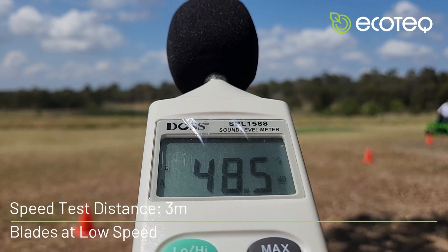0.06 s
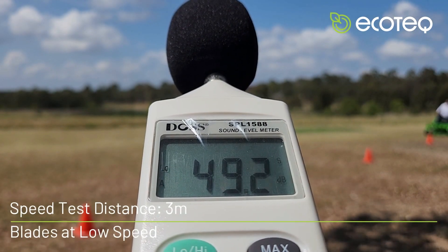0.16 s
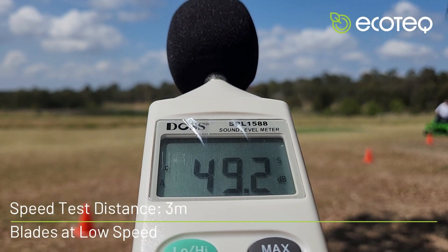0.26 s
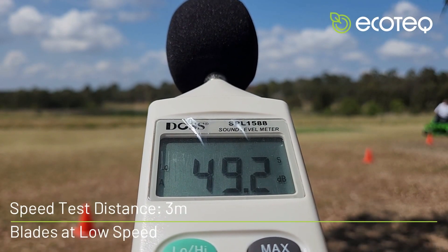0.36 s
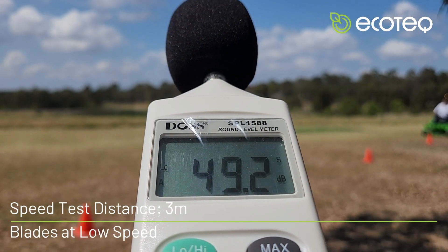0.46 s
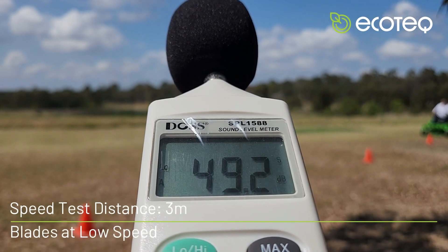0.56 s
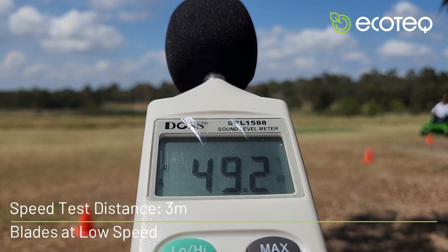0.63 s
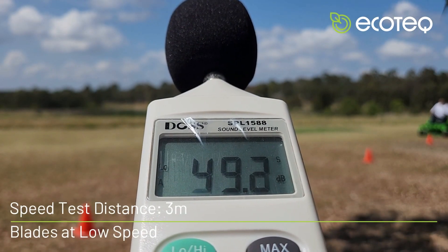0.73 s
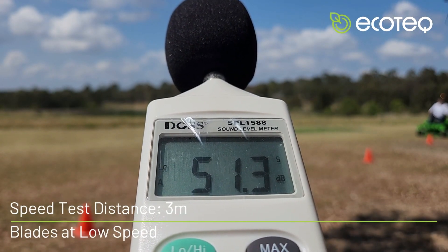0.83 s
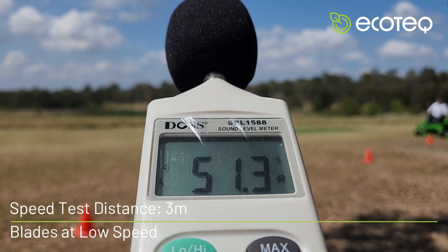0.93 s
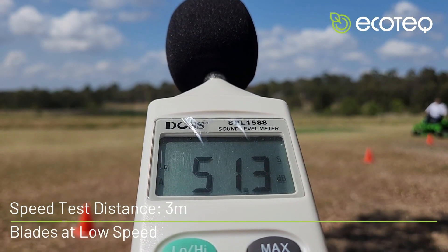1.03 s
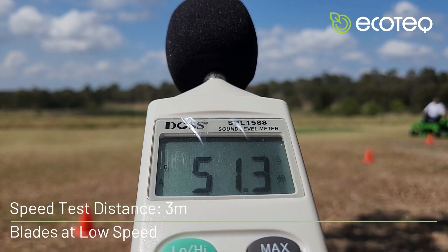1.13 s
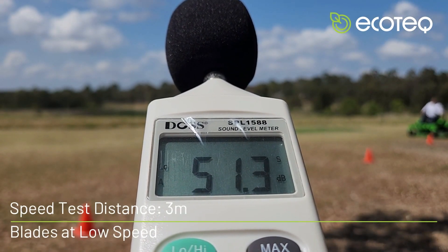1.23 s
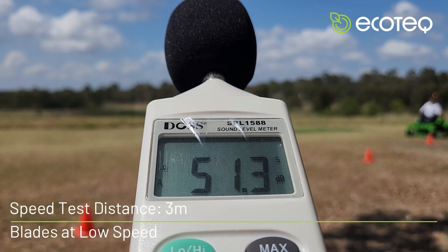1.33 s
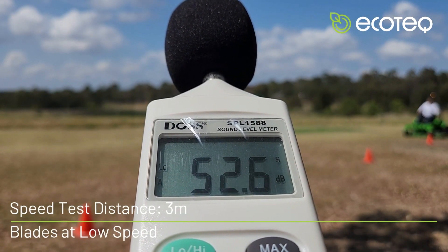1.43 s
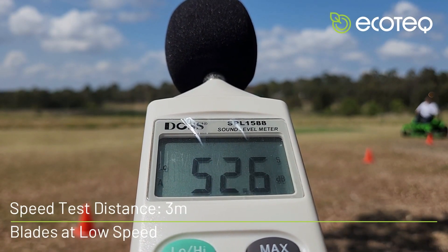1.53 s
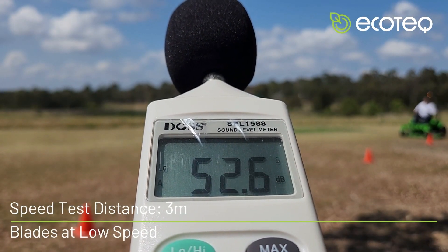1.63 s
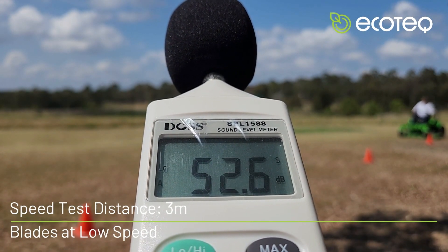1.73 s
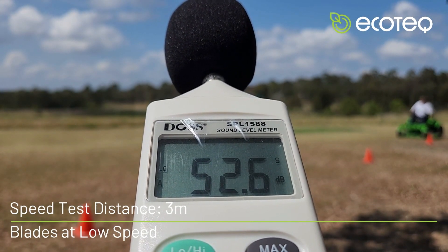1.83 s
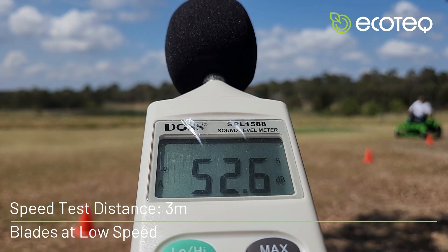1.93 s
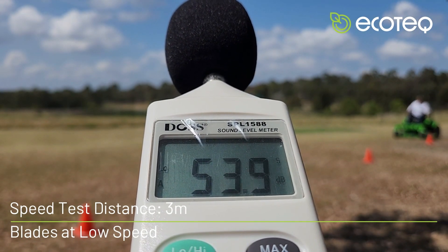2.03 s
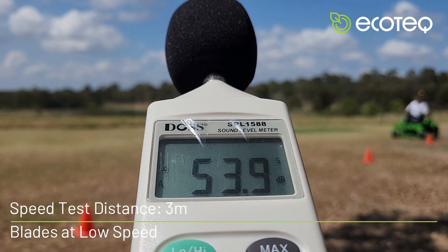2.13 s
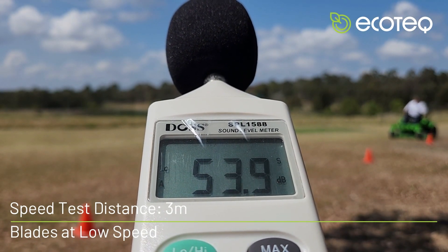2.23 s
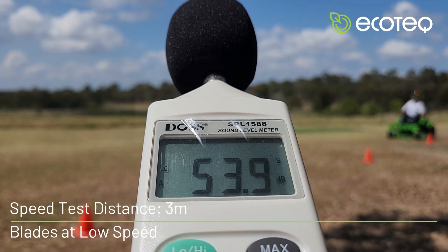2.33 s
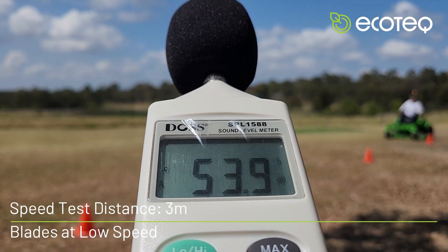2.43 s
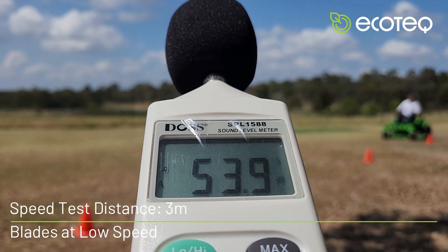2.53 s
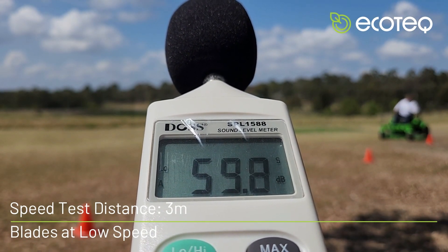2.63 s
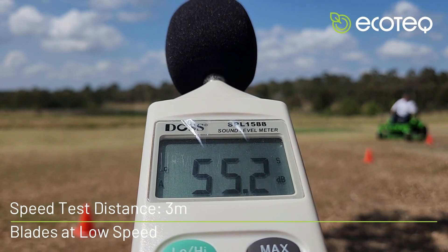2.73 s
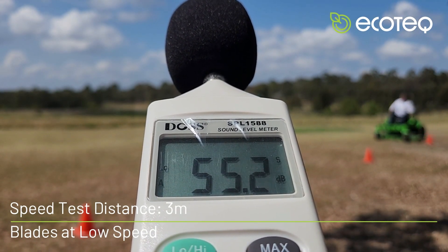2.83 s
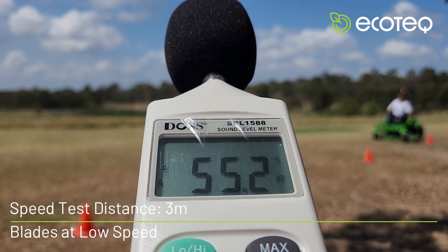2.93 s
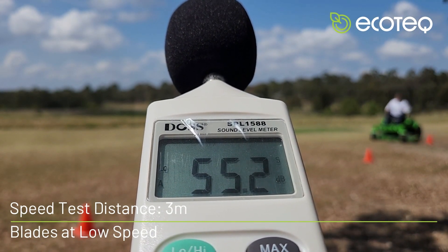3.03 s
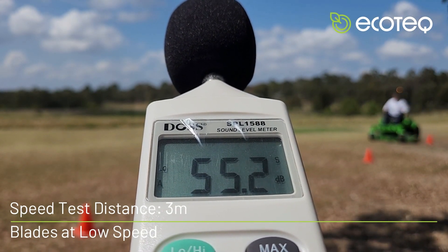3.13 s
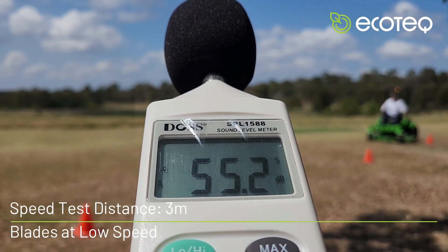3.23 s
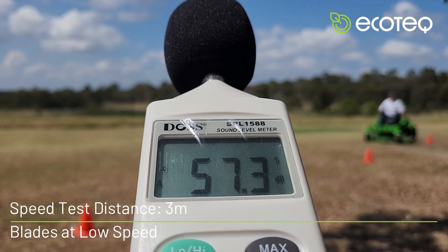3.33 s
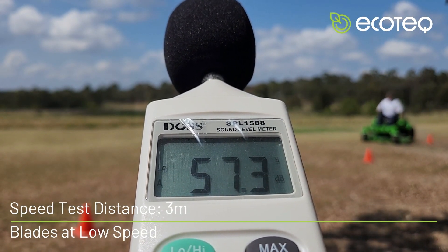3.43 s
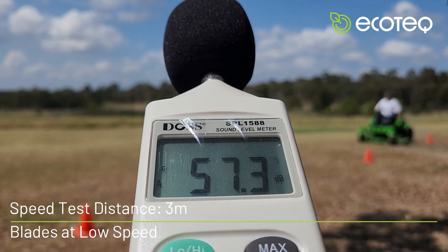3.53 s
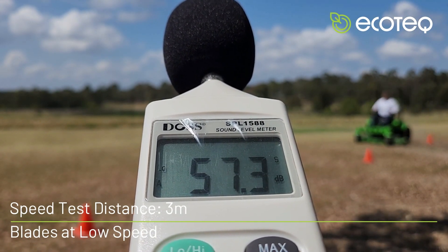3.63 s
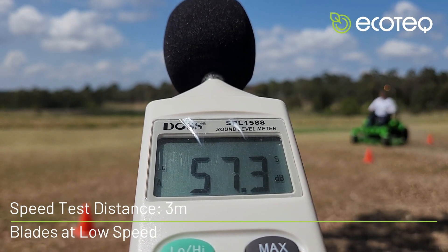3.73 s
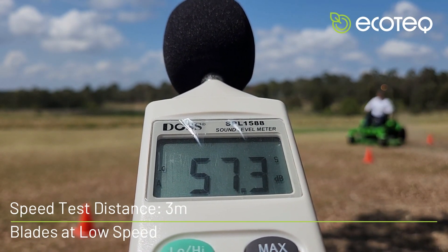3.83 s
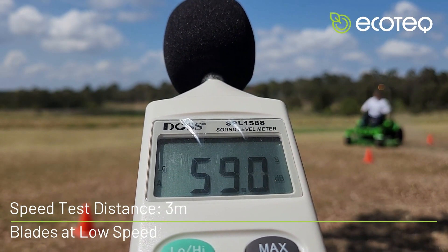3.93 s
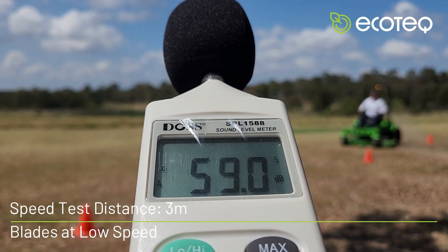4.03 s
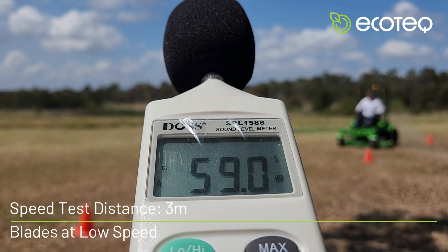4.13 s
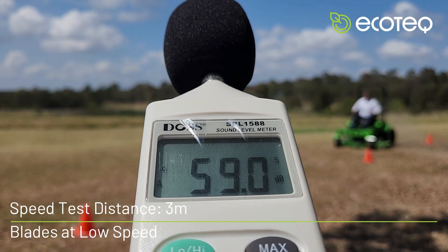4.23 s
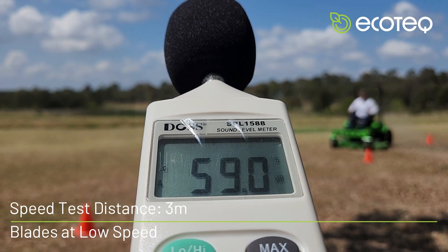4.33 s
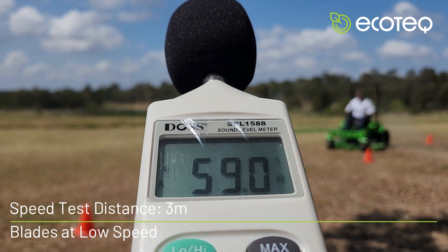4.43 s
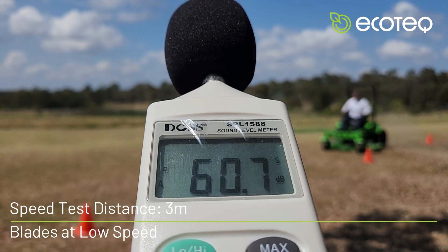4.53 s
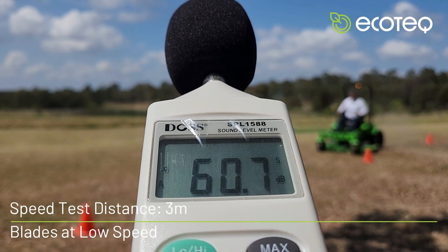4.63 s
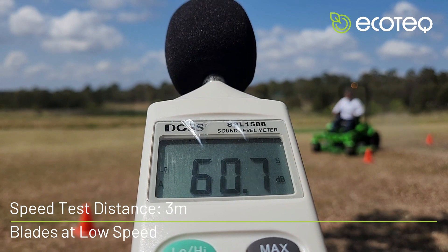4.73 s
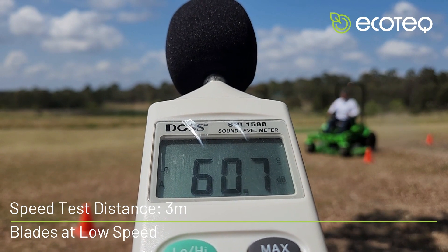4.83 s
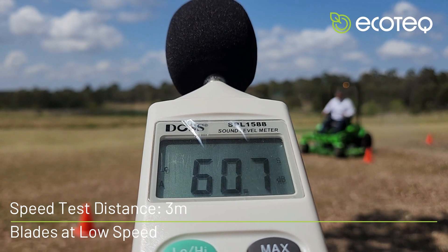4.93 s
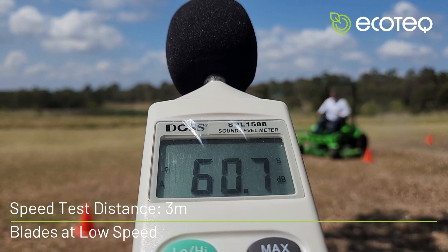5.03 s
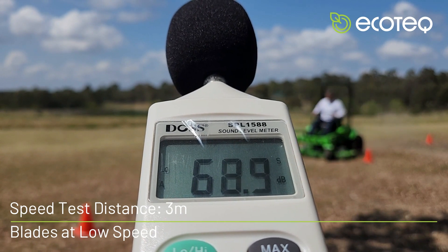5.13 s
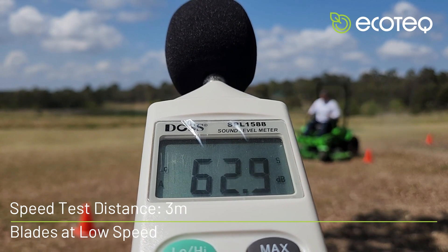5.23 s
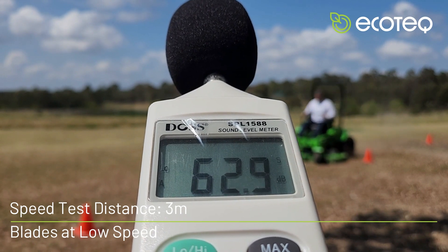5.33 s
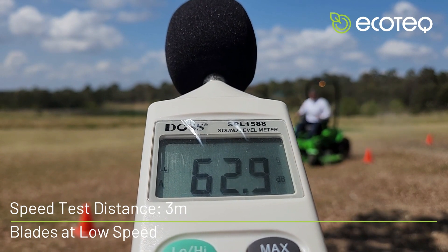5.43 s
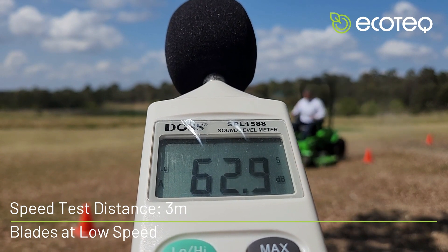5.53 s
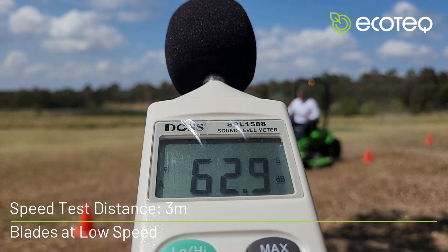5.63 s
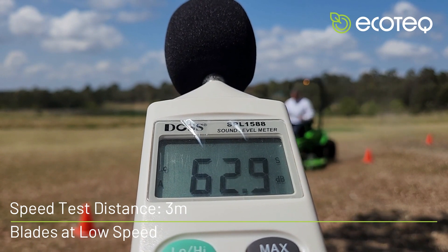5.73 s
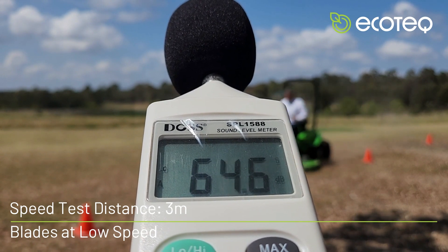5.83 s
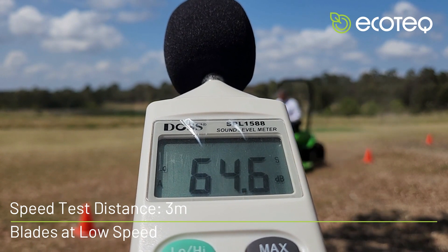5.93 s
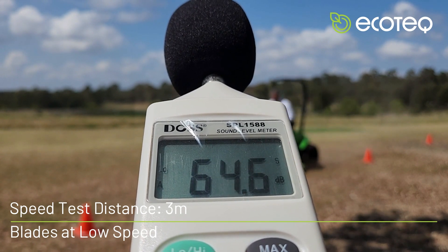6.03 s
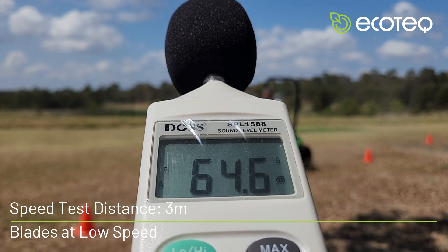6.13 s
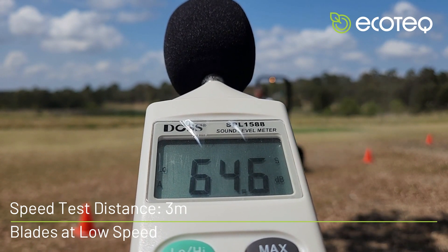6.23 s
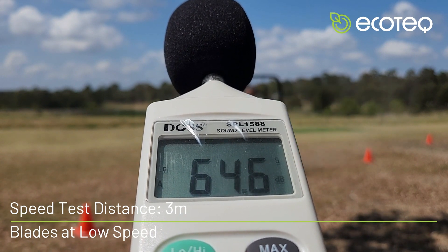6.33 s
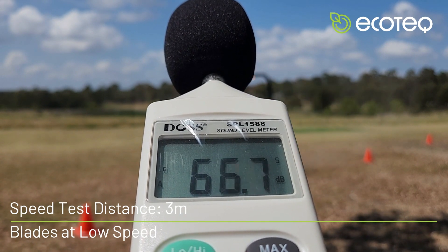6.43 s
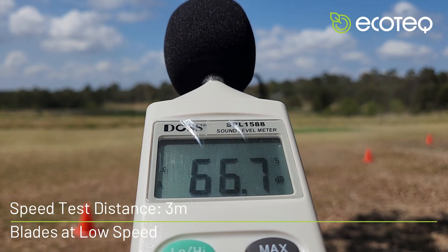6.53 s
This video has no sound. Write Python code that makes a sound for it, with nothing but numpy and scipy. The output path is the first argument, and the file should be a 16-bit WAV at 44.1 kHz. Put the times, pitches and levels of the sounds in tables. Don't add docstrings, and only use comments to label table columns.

```python
import sys
import numpy as np
from scipy import signal
from scipy.fft import rfft, irfft, next_fast_len
from scipy.io import wavfile
from scipy.ndimage import uniform_filter1d, map_coordinates

SR = 44100
rng = np.random.default_rng(int(sys.argv[2]) if len(sys.argv) > 2 else 0)


def boost(x):
    u = np.asarray(x, float) / 20
    return 10 ** u


def wav_record(signal):
    frames = np.transpose(np.atleast_2d(signal))
    bounded = np.clip(frames, -1, 1)
    quanta = np.round(bounded * 32767).astype(np.int16)
    wavfile.write(sys.argv[1], SR, quanta)


N = 289516
TIME = np.arange(N) / SR

# (time [s], level [dB])
GUSTS = [(0.0, -34), (0.42, -32.5), (0.55, -42.5), (0.85, -36.5), (1.9, -34.5), (2.2, -30), (3.2, -27),
         (3.6, -30.5), (4.2, -27), (4.8, -28), (6.0, -28.5), (6.2, -25.5), (6.56, -36)]
# (frequency [Hz], density [dB per Hz])
WIND_COLOUR = [(12, -34), (28, -22), (60, -1), (90, 2.5), (130, -2), (170, -17.5), (230, -17), (320, -50)]
# (time [s], level [dB], pitch [Hz])
EDDIES = [(.285, -26, 60), (1.22, -39, 65), (2.445, -8, 45), (2.875, -8, 61.3), (4.18, -18, 45),
          (4.48, -22, 50), (4.8, -13, 37), (5.14, -12, 55), (5.3, -16, 50), (6.09, -19, 50),
          (6.18, -10.5, 65)]
# (frequency [Hz], density [dB per Hz])
FIELD_COLOUR = [(200, 15), (500, 5), (1500, 8.5), (3500, 5.5), (7000, -9), (11000, 8), (17000, -53)]
# (time [s], level [dB])
ROAR = [(0.0, -40), (0.12, -37.5), (0.6, -44), (1.57, -46), (2.04, -40), (2.5, -41), (2.67, -38.5),
        (2.85, -38), (4.66, -34.5), (5.1, -35.5), (5.25, -31.5), (5.5, -33.5), (5.93, -31.5), (6.03, -30),
        (6.18, -31), (6.3, -32.5), (6.56, -29.5)]
# (frequency [Hz], density [dB per Hz])
DECK_COLOUR = [(230, -30), (300, -0.5), (400, -12), (540, -3), (690, 1), (800, -10), (870, -9.5),
               (1000, -5.5), (1300, -2), (1420, -7), (1550, -19), (2000, -31)]
# (time [s], level [dB])
HUM = [(0.08, -39), (.27, -22), (0.52, -34), (0.72, -22.5), (1.0, -28.5), (1.15, -45), (1.3, -29),
       (1.72, -28.5), (2.05, -17.5), (3.18, -15.5), (3.31, -30.5), (3.5, -19), (3.85, -17.5), (4.22, -27),
       (4.34, -13), (5.0, -13), (6.4, -20.5), (6.56, -25)]
CANCELS = [.52, 1.42, 2.03, 3.16, 4.25, 5.15, 7.8]
# (start [s], length [s], level [dB])
ROCKS = [
    (.82, 0.076, -46),
    (2.037, 1.13, -30),
    (3.692, 0.17, -32.5),
    (4.08, 0.064, -27.5),
    (4.3, 0.98, -41.5),
    (5.45, 0.24, -40),
    (6.08, .4, -38),
]
# (multiple [1], level [dB])
SHUDDER_LINES = [(3, -1), (4, 3.5), (5, -7), (6, -0.5), (7, -19)]
# (time [s], width [s], level [dB], tilt [dB per multiple])
SHUDDERS = [
    (0.13, 0.05, -33.5, -4.5),
    (0.31, 0.033, -34, -3),
]
# (multiple [1], level [dB])
OVERTONES = [(1, -35), (5, -7), (6, -5.5), (8, -11.5), (9, -9.5), (10, -5.5), (12, -5.5), (13, -10)]
# (frequency [Hz], density [dB per Hz])
GRASS_COLOUR = [(1300, -19.5), (1750, -0.5), (2350, -1.5), (2550, -11.5), (2950, -8.5), (3080, 0.5),
                (3750, -6.5), (3950, -15), (4600, -12), (5400, -8), (6100, -14), (6400, -55), (8500, -44)]
# (frequency [Hz], density [dB per Hz])
CHAFF_COLOUR = [(4000, -44), (5400, 7.5), (7000, -2.5), (8500, 1.5), (10500, 8.5), (12500, 4.5), (15000, 2),
                (17000, 16.5)]
# (time [s], width [s], cut grass level [dB], chaff level [dB])
PATCHES = [(0.4, 0.047, -38.5, -46.5), (0.903, 0.32, -45, -50.5), (1.993, 0.089, -48, -50),
           (3.188, 0.068, -44, -55), (3.75, 0.35, -41.5, -50.5), (4.25, 0.6, -44.5, -48.5),
           (4.608, 0.053, -38, -46.5), (5.374, 0.22, -38.5, -45.5), (6.08, 0.27, -39, -44),
           (6.35, 0.055, -54, -69), (6.527, 0.037, -41, -47.5), (2.995, 0.05, -51, -49)]
# (time [s], pitch [Hz], level [dB])
SWITCHING = [(0, 15500, -65), (.4, 15590, -64), (.9, 16300, -82), (2.8, 16000, -75), (4.5, 15000, -69),
             (6.56, 15520, -54)]
# (start [s], length [s], end pitch [Hz], level [dB], extra at load peak [dB])
LOW_SQUEAKS = [(0.079, 0.19, 9600, -46, 1), (0.847, 0.092, 10360, -33, 5.5), (1.38, .11, 10100, -34, -9),
               (1.943, .1, 9990, -36.5, 12.5), (2.442, 0.087, 10100, -38.5, 16.5),
               (2.922, 0.087, 10170, -38, 7.5), (3.394, 0.086, 10060, -32, 0.5),
               (3.834, .068, 10150, -27.5, -5), (4.268, 0.081, 10130, -27, 1),
               (4.661, 0.081, 10500, -25.5, 0), (5.036, .083, 10070, -26, 7.5),
               (5.424, 0.063, 10430, -24.5, 7.5), (5.799, 0.089, 10300, -24.5, -1),
               (6.163, 0.058, 10300, -19.5, -12), (6.531, .07, 10200, -32, 0)]
# (start [s], length [s], start pitch [Hz], rise [Hz], level [dB])
MID_SQUEAKS = [(.022, 0.086, 10370, 450, -42.5), (.797, 0.086, 10480, 420, -38.5),
               (2.415, .033, 10640, 450, -36), (2.878, 0.076, 10550, 250, -35),
               (3.365, 0.035, 10500, 650, -34.5), (3.792, 0.049, 10490, 400, -26),
               (4.637, .03, 10440, 600, -27), (5.37, 0.052, 10200, 1140, -20),
               (5.758, 0.042, 10200, 1000, -22.5), (6.5, 0.061, 10260, 860, -28.5)]
# (start [s], length [s], start pitch [Hz], rise [Hz], level [dB])
HIGH_SQUEAKS = [(1.358, .027, 12500, 61, -44), (1.93, .025, 12330, 70, -47), (3.79, .02, 12330, 10, -42),
                (4.232, 0.018, 12250, 150, -30), (4.655, .015, 12300, 100, -42),
                (5.01, 0.049, 12200, 410, -30), (5.755, 0.02, 12000, 150, -59),
                (6.117, 0.043, 12170, 420, -21.5)]
# (time [s], peak level [dB])
TICKS = [(1.8054, -32), (3.9749, -29), (4.2023, -29), (4.353, -18), (4.3914, -29), (4.578, -32),
         (4.6359, -29), (5.036, -27), (5.3044, -27), (5.5338, -36), (5.6531, -32), (5.8706, -34),
         (6.024, -26), (6.4462, -40)]
# (frequency [Hz], density [dB per Hz])
SNAP_COLOUR = [(3500, -15), (6000, -9), (10000, 6.5), (13000, 3), (16500, -3)]
# (time [s], pitch [Hz], level [dB])
GROAN = [
    (.28, 293, -50),
    (.32, 323, -40),
    (.36, 375, -51),
]
# (time [s], level [dB])
WHINE = [(2.2, -51.5), (2.36, -41.5), (2.5, -54.5), (2.6, -39), (2.73, -40), (2.8, -62.5), (3.002, -49),
         (3.4, -53)]
# (frequency [Hz], left minus right [dB])
PORTS = [(60, 3.5), (110, 0.5), (200, 0.5), (380, 0.5), (700, 0), (1290, 4), (2380, 2), (4400, -0.5),
         (8120, -1), (15000, -2.5)]


def unit(x):
    return x / np.sqrt(np.mean(x ** 2))


def curves(table):
    s, *columns = np.transpose(table)
    return [np.interp(TIME, s, c) for c in columns]


def bump(s, width):
    return np.exp(-.5 * ((TIME - s) / width) ** 2)


def walk(rate):
    k = int(SR / rate)
    held = np.repeat(rng.standard_normal(N // k + 1), k)
    return unit(uniform_filter1d(uniform_filter1d(held, k), k)[:N])


def colour(x, shape):
    size = next_fast_len(N)
    hz, db = np.transpose(shape)
    bins_hz = np.arange(size // 2 + 1) * SR / size
    gain = boost(np.interp(np.log(bins_hz + 1), np.log(hz), db))
    return irfft(rfft(x, size) * gain, size)[:N]


def flutter(shape, swell_db, flicker_db, rate, count):
    size = next_fast_len(N)
    spectrum = rfft(colour(rng.standard_normal(N), shape), size)
    edges = np.geomspace(shape[0][0], shape[-1][0], count + 1) * size / SR
    band = np.searchsorted(edges[1:-1], np.arange(len(spectrum)))
    swell = swell_db * walk(rate / 4)
    total = np.zeros(N)
    for k in range(count):
        noise = irfft(spectrum * (band == k), size)[:N]
        total += boost(swell + flicker_db * walk(rate)) * noise
    return unit(total)


def whistle(table, wobble_hz, grip_db, edge, lag):
    s, hz, db = np.transpose(table)
    part = slice(int(s[0] * SR), min(int(s[-1] * SR), N))
    t, out = TIME[part], np.zeros((2, N))
    step = 2 * np.pi * (np.interp(t, s, hz) + wobble_hz[part]) / SR
    phase = np.cumsum(step) - step * lag[part] * np.array([[1], [0]])
    level = np.sqrt(2) * boost(np.interp(t, s, db) + grip_db[part])
    out[:, part] = level * np.sin(phase) * signal.windows.tukey(len(t), edge)
    return out


def port_lag():
    abreast_s, distance_m, speed_m_s = 6.7, 3, 1.7
    gather_s = 2.2
    along_m = speed_m_s * gather_s * np.log1p((abreast_s - TIME) / gather_s)
    return 10.5 * along_m / np.hypot(along_m, distance_m)


def approach():
    roar_db = curves(ROAR)[0]
    grass = boost(-45 + 0.76 * (roar_db + 40)) ** 2
    chaff = boost(-57 + 0.17 * (roar_db + 39.5)) ** 2
    for s, width, patch_grass_db, patch_chaff_db in PATCHES:
        grass = grass + boost(patch_grass_db) ** 2 * bump(s, width)
        chaff = chaff + boost(patch_chaff_db) ** 2 * bump(s, width)
    return roar_db, 10 * np.log10(grass), 10 * np.log10(chaff)


def wind():
    both, apart = (flutter(WIND_COLOUR, .5, 1.8, 22, count=6) for _ in range(2))
    thumps = np.zeros(N)
    for s, db, hz in EDDIES:
        width_s = .42 / hz
        thumps += boost(db) * bump(s, width_s) * np.sin(2 * np.pi * hz * (TIME - s))
    sides = np.array([[1], [-1]])
    gusts = boost(curves(GUSTS)[0] + 5.0) * (both + boost(-7.0) * apart * sides)
    return gusts + boost(-1.5 * sides) * np.array([thumps, np.roll(thumps, 60)])


def field():
    return boost(-44) * np.array([flutter(FIELD_COLOUR, 0.38, 0.77, 6, count=4) for _ in range(2)])


def shaft_phase():
    full_hz, shortfall_hz, spin_up_s = 52.9, 9.3, .33
    hz = full_hz - shortfall_hz * np.exp(-(TIME / spin_up_s) ** 1.503)
    return 2 * np.pi * np.cumsum(hz) / SR


def deck_roar(roar_db, turn):
    chop = 1 + .1 * np.sin(turn) + 0.096 * np.sin(2 * turn)
    return boost(roar_db + 0.34) * chop * flutter(DECK_COLOUR, 0.52, 2.37, 12, count=10)


def blades(roar_db, turn):
    rock = np.zeros(N)
    for s, length, db in ROCKS:
        outside_s = np.maximum(np.maximum(s - TIME, TIME - s - length), 0)
        rock += boost(db) * np.exp(-.5 * (outside_s / 0.034) ** 2)
    slip = np.pi * np.interp(TIME, CANCELS, np.arange(len(CANCELS)))
    beat = np.sin(slip) + 1j * 0.21 * np.cos(slip)
    fourth = boost(roar_db + 4.5 + 0.26 * (roar_db + 36)) * beat
    tones = np.zeros(N)
    for k, gain in zip((2, 3, 4), (boost(curves(HUM)[0]), rock, fourth)):
        level = gain * boost(.4 * k * walk(16))
        tones += np.imag(level * np.exp(1j * (k * turn + .12 * k * walk(9))))
    for k, db in SHUDDER_LINES:
        for s, width, top_db, tilt_db in SHUDDERS:
            tones += boost(db + top_db + tilt_db * (k - 3.5)) * bump(s, width) * np.sin(k * turn)
    lock = boost(-8.5) * np.clip(TIME / 0.61, 0, 1) ** 2
    for k, db in OVERTONES:
        level = lock * boost(db + roar_db + 3.2 * walk(10))
        tones += level * np.sin(k * turn + .14 * k * walk(11))
    return np.sqrt(2) * tones


def cut_grass(grass_db):
    return boost(grass_db) * flutter(GRASS_COLOUR, 1.3, 1.7, 14, count=8)


def chaff(chaff_db):
    return boost(chaff_db + 6.0) * flutter(CHAFF_COLOUR, 0.96, 3.5, 16, count=6)


def ground_scatter(roar_db, chaff_db):
    ports = []
    for _ in range(2):
        hiss = boost(chaff_db + 14.5) * flutter(CHAFF_COLOUR, 1.0, 1.4, 14, count=3)
        rush = unit(colour(rng.standard_normal(N), DECK_COLOUR[:-1] + GRASS_COLOUR[1:]))
        ports.append(hiss + boost(roar_db - 9) * rush)
    return np.array(ports)


def controller(lag):
    return whistle(SWITCHING, 12 * walk(40), 3.3 * walk(12), .01, lag)


def squeak(s, length, start_hz, rise_hz, db, load_db=0, slack_db=0):
    u = np.linspace(0, 1, 16)
    bite = np.exp(-u / 0.072)
    slack = slack_db * np.exp(-((u - .42) / 0.2) ** 2)
    load = load_db * np.exp(-((u - .72) / 0.13) ** 2)
    fade = -6 * u ** 6
    return np.transpose([s + length * u, start_hz + rise_hz * u ** 2.2, db + bite + slack + load + fade])


def squeaks(lag):
    wobble_hz, grip_db = 25 * walk(300), 3.0 * walk(130)
    low_hz = 9318
    lows = [squeak(s, d, low_hz, hz - low_hz, db, load_db, -3.5) for s, d, hz, db, load_db in LOW_SQUEAKS]
    mids = [squeak(*row, -4.5) for row in MID_SQUEAKS]
    highs = [squeak(*row, -4.5) for row in HIGH_SQUEAKS]

    def wheel(group, ahead):
        return sum(whistle(rows, wobble_hz, grip_db, .04, lag - ahead) for rows in group)

    side = np.array([[.5], [-.5]])
    low = wheel(lows, 0) * boost(side * (-3.5 + 5.8 * (TIME / 5.65) ** 4))
    mid = wheel(mids, .65) * boost(side * (-0.5 - 0.72 * TIME))
    return low + mid + wheel(highs, .4)


def ground_echo(wheels):
    late = np.arange(SR // 6) / SR
    tail = rng.standard_normal((2, len(late))) * np.exp(-late / 0.038) * np.clip(late / 0.0018, 0, 1)
    return boost(-41) * signal.fftconvolve(wheels, tail, axes=1)[:, :N]


def ticks(chaff_db):
    per_s = 130 * np.clip(TIME / 4.5, 0, 1) ** 2
    hits = (rng.random(N) < per_s / SR) * boost(chaff_db + 3 + 8 * rng.random(N))
    s, db = np.transpose(TICKS)
    hits[(s * SR).astype(int)] = boost(db)
    late = np.arange(SR // 50) / SR
    decay = np.exp(-late / .0012) + 0.2 * np.exp(-late / 0.007)
    burst = signal.fftconvolve(hits, decay)[:N] * rng.standard_normal(N)
    return boost(3.0) * colour(burst, SNAP_COLOUR)


def panel_groan(lag):
    return whistle(GROAN, 0 * lag, 0 * lag, .3, lag)


def drive_whine(lag):
    rows = [(s, 548 + 2.1 * (db + 47), db) for s, db in WHINE]
    return whistle(rows, 4 * walk(30.16), 2.0 * walk(24.9), 0.049, lag)


def mower(lag, roar_db, grass_db, chaff_db):
    turn = shaft_phase()
    low = deck_roar(roar_db, turn) + blades(roar_db, turn)
    high = cut_grass(grass_db) + chaff(chaff_db) + ticks(chaff_db)
    left = map_coordinates(np.roll(low, -2) + high, [np.arange(N) - lag], order=5, mode="nearest")
    return np.array([left, low + high]) + controller(lag) + panel_groan(lag) + drive_whine(lag)


def scene():
    lag = port_lag()
    roar_db, grass_db, chaff_db = approach()
    wheels = squeaks(lag)
    machine = mower(lag, roar_db, grass_db, chaff_db) + wheels
    ground = ground_echo(wheels) + ground_scatter(roar_db, chaff_db)
    return wind() + field() + machine + ground


def band_limit(x):
    return signal.sosfilt(signal.butter(12, 15780, fs=SR, output="sos"), x)


def record(dry):
    left, right = (colour(x, [(hz, db * half) for hz, db in PORTS]) for x, half in zip(dry, (.5, -.5)))
    low_pass = signal.ellip(10, .2, 70, 15780, fs=SR, output="sos")
    mix = signal.sosfilt(low_pass, np.array([left, right]))
    return band_limit(mix)


dry = scene()
out = record(dry)
wav_record(out)
```